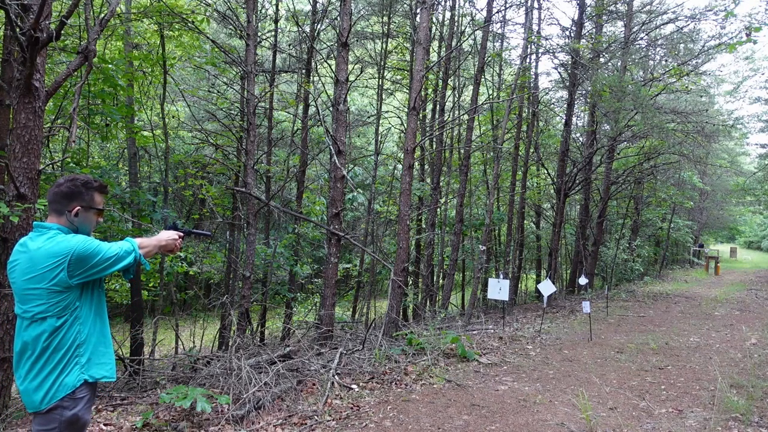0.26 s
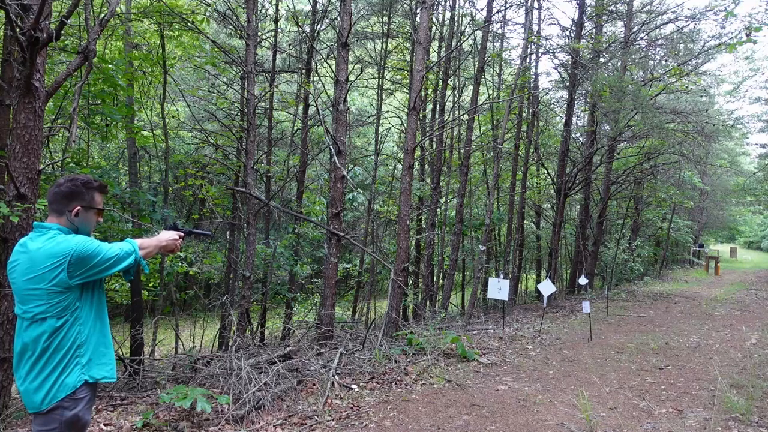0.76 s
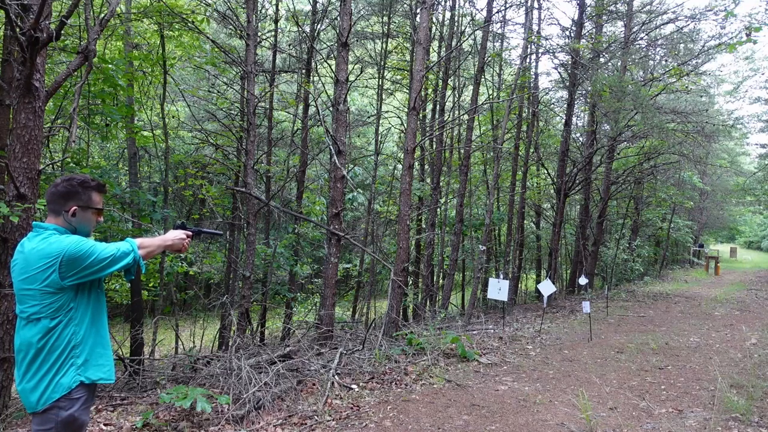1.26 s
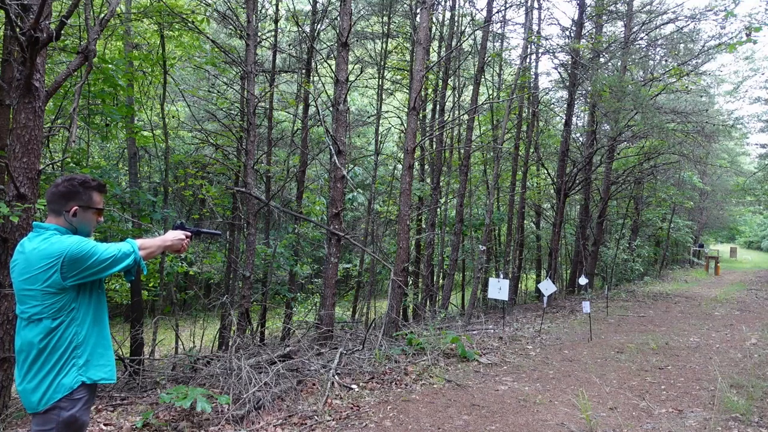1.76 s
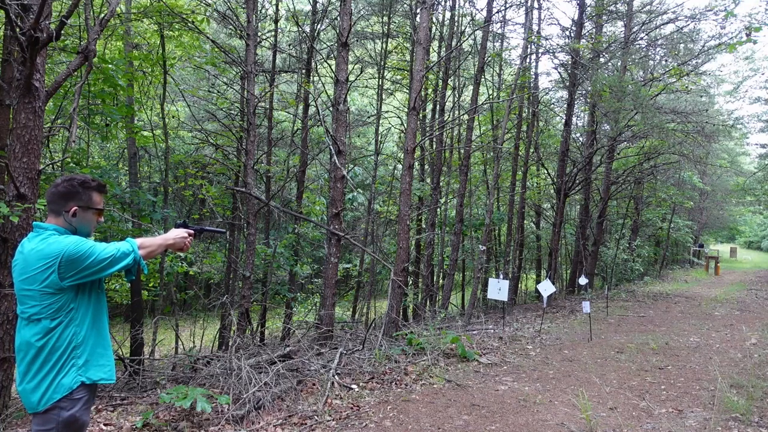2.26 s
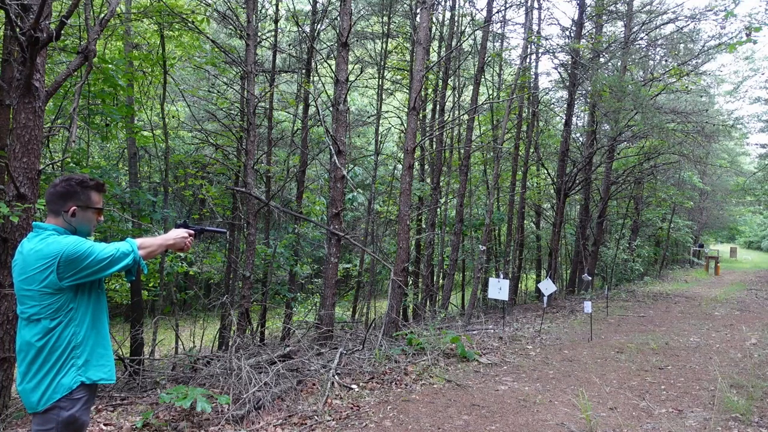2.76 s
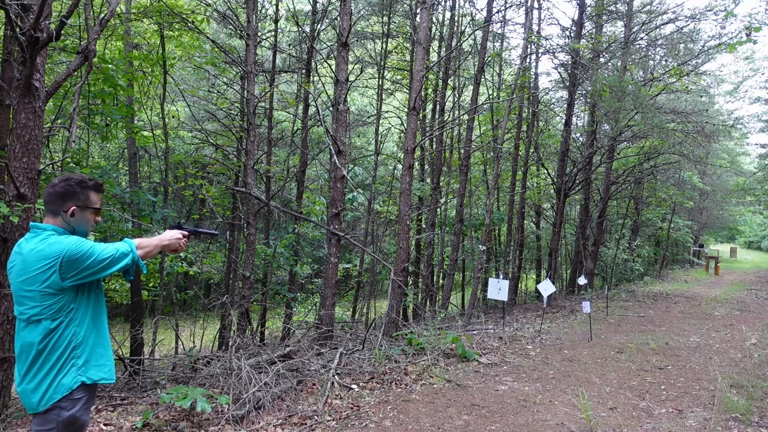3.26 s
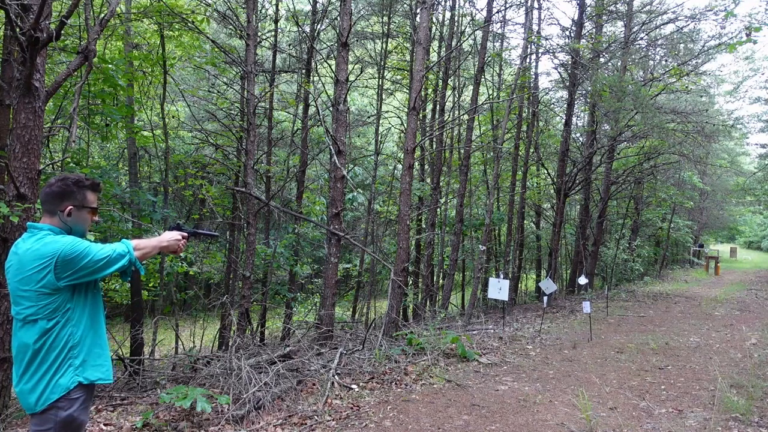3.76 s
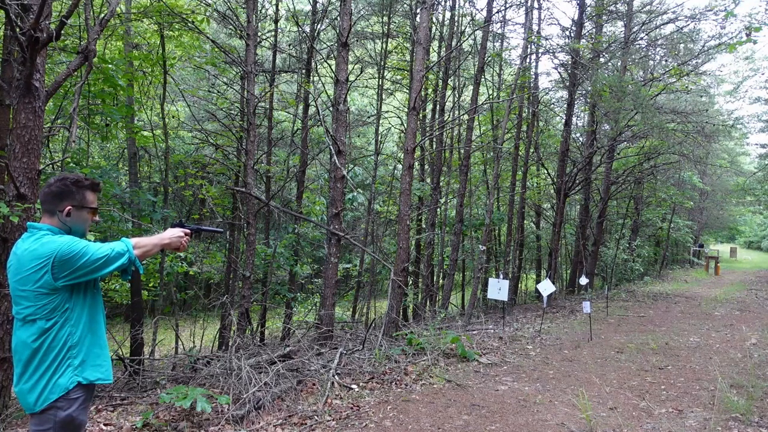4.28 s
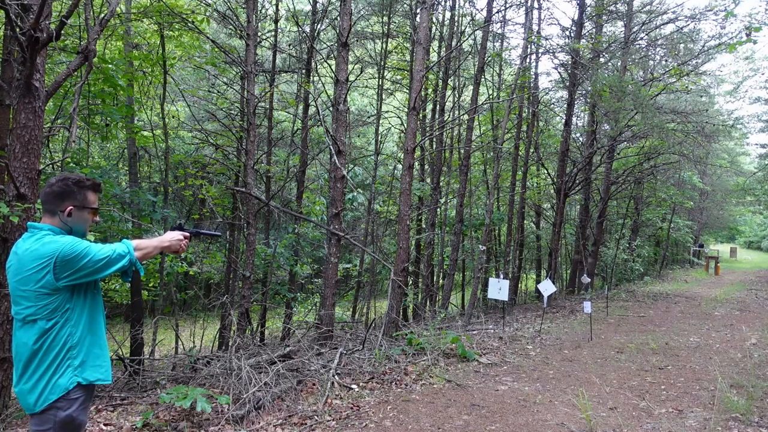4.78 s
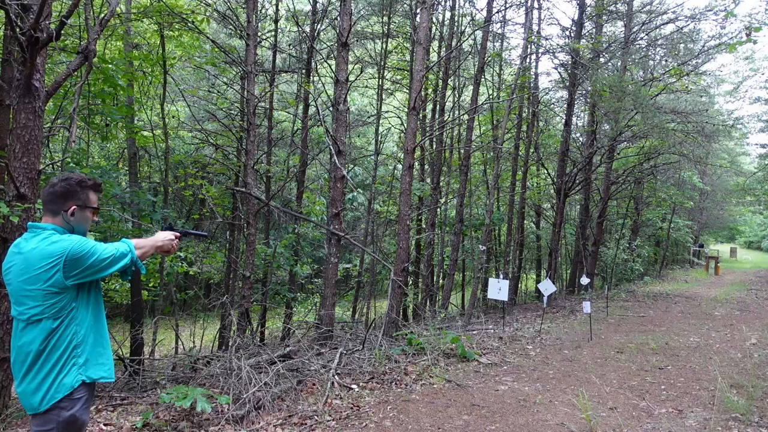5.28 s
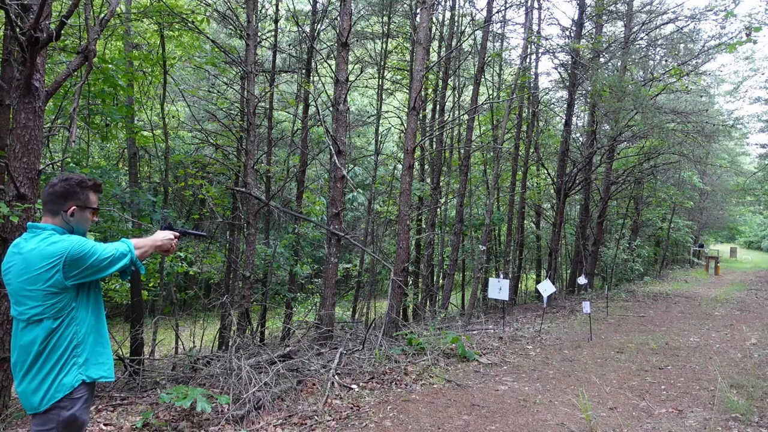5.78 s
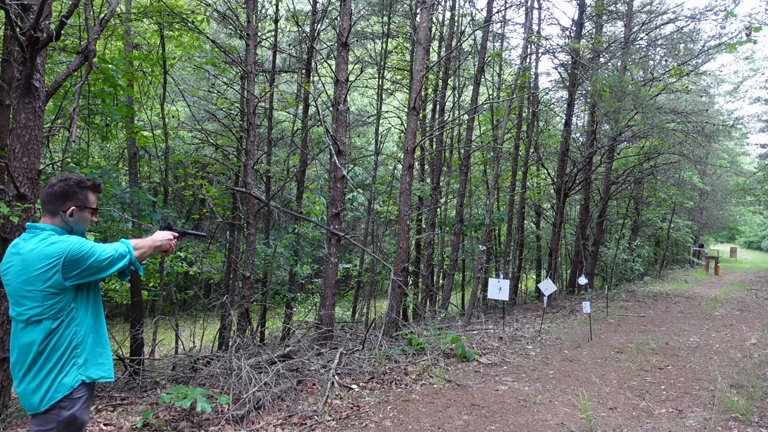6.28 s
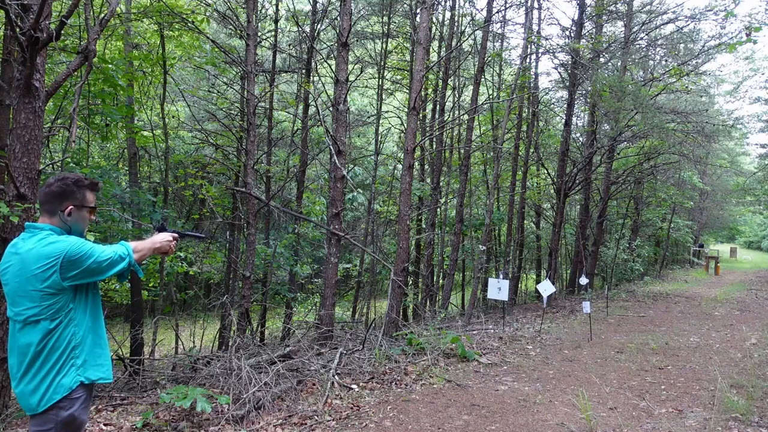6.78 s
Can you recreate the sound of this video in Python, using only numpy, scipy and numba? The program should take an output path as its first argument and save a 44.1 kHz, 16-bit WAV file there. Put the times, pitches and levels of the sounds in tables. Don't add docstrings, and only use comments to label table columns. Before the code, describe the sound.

Nine overloaded handgun bangs at uneven spacing, bullets clanging hanging steel almost instantly, forest reverberation fading, spent cases ticking in dry leaves between.

```python
import sys
import numpy as np
from scipy import signal
from scipy.fft import rfft, irfft, next_fast_len
from scipy.io import wavfile
from scipy.ndimage import uniform_filter1d
from numba import njit

SR = 44100
rng = np.random.default_rng(int(sys.argv[2]) if len(sys.argv) > 2 else 0)


def output_pcm(signal):
    pcm = np.clip(np.atleast_2d(signal).T, -1, 1) * 32767
    wavfile.write(sys.argv[1], SR, np.round(pcm).astype(np.int16))


def field_ratio(decibels):
    return 10 ** (np.asarray(decibels, dtype=float) / 20)


N = 310023


def along(points, hz):
    f, *columns = np.transpose(points)
    return [np.interp(np.log(hz + 1), np.log(f), column) for column in columns]


def noise(spectrum, size):
    gain = field_ratio(along(spectrum, np.fft.rfftfreq(size, 1 / SR))[0])
    x = irfft(rfft(rng.standard_normal(size)) * gain, size)
    return x / x.std()


def add(out, x, s):
    i = round(s * SR)
    x = x[max(-i, 0):][:N - max(i, 0)]
    out[max(i, 0):][:len(x)] += x


def burst(spectrum, t60, hold):
    t = np.arange(8192) / SR
    return noise(spectrum, size=8192) * field_ratio(-60 * np.maximum(t - hold, 0) / t60)


STEP = 16


def ring(hz, db, t60, t, linger_db=-18, beam=1):
    slow = field_ratio(-30 * t[::STEP] / t60)
    shape = field_ratio(db) * beam * slow * (slow + field_ratio(linger_db - hz / 600))
    shape = np.repeat(shape.astype(np.float32), STEP, axis=-1)[..., :len(t)]
    turns = (hz * t % 1).astype(np.float32)
    return shape * np.sin(np.float32(2 * np.pi) * turns)


# f/Hz, near trees level/dB, near t60/s, far trees level/dB, far t60/s
TREES = [(150, -44.5, 0.17, -72, 2.3), (377, -5.5, 0.48, -28.5, 3.12), (900, -2, 0.59, -28, 3.38),
         (2100, -1, 0.61, -23.5, 1.895), (3780, -2, 0.53, -33.5, 1.835), (7000, 1, 0.46, -28, 1.09),
         (10000, -3.5, 0.39, -35, 1.15), (15100, -14.5, 0.36, -50, 0.6)]
# t/s after the shot, level/dB
SWELL = [(0, -4.5), (.03, -3), (.07, 4), (.11, -3), (.15, 2.5), (.2, 2.5), (.3, 5)]


def wood(length=2):
    hz, t, z = signal.stft(rng.standard_normal(length * SR), SR, nperseg=256)
    near_db, near_t60, far_db, far_t60 = (c[:, None] for c in along(TREES, hz))
    gain = np.hypot(field_ratio(near_db - 60 * t / near_t60), field_ratio(far_db - 60 * t / far_t60))
    swell = field_ratio(np.interp(t, *np.transpose(SWELL)))
    roar = signal.istft(z * gain * swell, SR, nperseg=256)[1][:length * SR]
    trunks = np.repeat(rng.exponential(size=length * SR // 30), 30)
    fade = np.exp(-np.arange(length * SR) / SR / 0.31)
    return roar * field_ratio(1.55 * fade * (uniform_filter1d(trunks, size=20) - 4))


# t/s, charge level/dB, low push level/dB
SHOTS = [
    (-.2, 8, -20),
    (.2289, 0, -6),
    (0.6596, 2, -18),
    (1.6838, 0, -16),
    (2.66, -1, -6),
    (3.5408, -1, -5),
    (4.5178, -1, -3),
    (5.6642, 1.5, -1.5),
    (6.0412, -3, -7),
    (6.3554, -4.5, -7),
]


def wood_roar():
    out = np.zeros(N)
    for s, db, _ in SHOTS:
        add(out, field_ratio(db + 11.5) * wood(), s + .002)
    return out


def plate(shapes, modes, hits, sway_db, late, flash_db=0, gains_db=None):
    out = np.zeros(N)
    hz, across, down = np.transpose(shapes)[:, :, None]
    belly_db, t60 = np.transpose(modes)[:, :, None]
    ends = [row[0] for row in hits[1:]] + [N / SR]
    for k, ((s, x, y, ring_db, _), end) in enumerate(zip(hits, ends)):
        t = np.arange(round(min(end - s, 3, t60.max()) * SR)) / SR
        u = t[::STEP]
        age = late * (.1 - min(s, 0))
        struck = np.abs(np.cos(np.pi * across * x) * np.cos(np.pi * down * y)) + .03
        knots = rng.standard_normal((len(hz), 64))
        sway = np.array([np.interp(u * 17, np.arange(64), row) for row in knots])
        swing = (1 - 1.3 * np.abs(sway)) * np.minimum(u / .14, 1)
        beam = field_ratio(sway_db * np.minimum(hz / 3000, 1) * swing)
        beam *= field_ratio(flash_db * np.exp(-u / 0.055))
        level_db = belly_db + (gains_db[k] if gains_db else ring_db) + 60 * age / t60
        add(out, ring(hz, level_db, t60, t, beam=struck * beam).sum(0), s)
    return out


# f/Hz, level/dB
SPLAT = [(100, -38.5), (500, -13), (1300, 6.5), (3000, -2.5), (8000, -6), (16000, -16.5), (22000, -20)]


def splats(hits):
    out = np.zeros(N)
    for s, *_, db in hits:
        add(out, field_ratio(db) * burst(SPLAT, 0.025, hold=0.00084), s)
    return out


# t/s, spot across/0-1, spot down/0-1, ring level/dB, splat level/dB
SQUARE_HITS = [
    (-.166, .088, .234, -1.6, 8),
    (.2632, .377, .373, 12.5, 18),
    (.6938, .154, .219, 13.5, 15),
    (5.6977, .208, .14, 12.7, 16),
    (6.0752, .363, .385, 8.5, 11),
    (6.389, .159, .071, 5.3, 12),
]
# f/Hz, still lines across, still lines down
BODY_MODES = [(614.4, 0, 0), (889.5, 0, 0), (1545.2, 3, 1), (1571.7, 0, 2), (1954.4, 3, 2)]
# level/dB, t60/s
BODY = [(-14.5, 4.47), (-28, 5.9), (3.7, 1.34), (-9.8, 1.19), (-1.2, .89)]
HUM_DB = [9.5, 5.1, 3.4, 3.4, -.6, -1.7]
# f/Hz, still lines across, still lines down
SQUARE_MODES = [(2632, 3, 1), (3093, 2, 1), (3779, 3, 3), (4174, 4, 3), (4892, 3, 1), (4974, 5, 2),
                (5319, 3, 2), (5926, 3, 0), (6816, 4, 4), (7260, 3, 6), (7370, 5, 4), (8349, 5, 4),
                (8688, 1, 7), (13559, 4, 7)]
# level/dB, t60/s
SQUARE = [(-22.5, 1.08), (-18.4, 0.67), (-31.8, 1.1), (-17.0, 0.76), (-17.8, 0.45), (-28.4, 0.75),
          (-27.3, 0.83), (-21.7, 0.41), (-19.6, 0.71), (-21.1, 0.57), (-25.4, 0.55), (-16.6, 0.5),
          (-15.0, 0.46), (-17.6, 0.51)]
# f/Hz, still lines across, still lines down
SQUARE_MORE_MODES = [(3332, 3, 1), (9378, 4, 2), (9916, 2, 7), (10817, 1, 7), (11066, 4, 6), (12182, 3, 6),
                     (13334, 4, 7), (15518, 5, 7), (5977, 5, 2), (7176, 5, 4), (8724, 6, 2), (13639, 6, 1),
                     (13765, 7, 2), (14904, 7, 2)]
# level/dB, t60/s
SQUARE_MORE = [(-28.1, 0.82), (-26.9, 0.72), (-25.4, 0.49), (-27.2, 0.51), (-30.8, 0.33), (-29.0, 0.53),
               (-23.9, 0.53), (-36.3, 0.28), (-29.7, 0.62), (-32.2, 0.23), (-28.0, 0.36), (-39.1, 0.67),
               (-41.6, 0.17), (-37.4, 0.4)]
# f/Hz, still lines across, still lines down
SQUARE_HIGH_MODES = [(10336, 3, 3), (10643, 3, 3), (13190, 5, 4), (13993, 5, 4), (14045, 5, 4), (14591, 5, 4)]
# level/dB, t60/s
SQUARE_HIGH = [(-34, .61), (-33, .32), (-42, .8), (-39, .47), (-42, .64), (-44, .4)]


def square_plate():
    flash_db = 3
    out = plate(BODY_MODES, BODY, SQUARE_HITS, sway_db=3, late=0, gains_db=HUM_DB)
    out += plate(SQUARE_MODES, SQUARE, SQUARE_HITS, sway_db=6, late=1, flash_db=flash_db)
    out += plate(SQUARE_MORE_MODES, SQUARE_MORE, SQUARE_HITS, sway_db=5, late=1, flash_db=flash_db)
    out += plate(SQUARE_HIGH_MODES, SQUARE_HIGH, SQUARE_HITS, sway_db=4, late=1)
    return out + splats(SQUARE_HITS)


# f/Hz, level/dB
AIR = [(15, -24), (30, 0), (100, 3.5), (200, -5.5), (500, -4), (1500, -15.5), (4000, -33), (16000, -42)]
# t/s, level/dB
BREEZE = [
    (0, -36.5),
    (1.002, -46),
    (1.601, -42),
    (2.5, -43.5),
    (3.5, -47),
    (4.5, -44.5),
    (5.5, -49),
    (6.2, -51),
    (7.03, -54),
]


def quiet_air():
    level = field_ratio(np.interp(np.arange(N) / SR, *np.transpose(BREEZE)))
    return level * noise(AIR, size=next_fast_len(N, True))[:N]


BANK_S = [
    -.0028,
    .0225,
    .0252,
    .127,
    .158,
    .185,
]
# level/dB, t60/s
BANKS = [
    (-30, 0.016),
    (-5, .014),
    (-3.5, 0.0053),
    (-16.5, 0.021),
    (-13.5, .006),
    (-20, 0.013),
]
# f/Hz, level/dB
ECHO = [(100, -37), (400, -10), (1200, 4), (3000, -6.5), (5500, -1.5), (10000, -11), (16000, -11),
        (22000, -19.5)]
# f/Hz, level/dB
FAR = [(300, -30), (1000, -1.5), (3000, 2), (6000, -2), (10000, -5), (16000, -51)]


def hammer_and_bank():
    out = np.zeros(N)
    for s, db, _ in SHOTS:
        for delay, (echo_db, t60) in zip(BANK_S, BANKS):
            colour = ECHO if delay < .1 else FAR
            add(out, field_ratio(db + 8.5 + echo_db) * burst(colour, t60, hold=0.00096), s + delay)
    return out


# f/Hz, level/dB
BLAST = [(25, -21), (100, -17.5), (300, -2), (1000, 0), (3000, -7), (6300, 0), (10000, -5.5),
         (16000, -22.5)]


def muzzle_blast():
    out = np.zeros(N)
    u = np.arange(2048) / SR / 0.00085
    push = u * (2 - u) * np.exp(-u)
    for s, db, push_db in SHOTS:
        add(out, field_ratio(db + 9) * burst(BLAST, .016, hold=.0032), s)
        add(out, field_ratio(push_db + 9.5) * push, s)
    return out


# t/s, step level/dB
JOLTS = [
    (0.6933, -4.5),
    (1.7175, -33.5),
    (4.5521, -22),
]


def jolts():
    steps = np.zeros(N)
    for s, db in JOLTS:
        steps[round(s * SR):] += field_ratio(db)
    cut_hz = 11
    return signal.sosfilt(signal.butter(3, cut_hz, "high", fs=SR, output="sos"), steps)


def tick(out, s, db, hz, t60):
    colour = [(500, -40), (2500, -14), (hz, 0), (hz + 4000, -8), (hz + 11000, -14)]
    click = burst(colour, t60, hold=.0005)
    rustle = field_ratio(-21) * burst(colour, .14, hold=0)
    add(out, field_ratio(db - 6) * (click + rustle), s)


# t/s, peak level/dB
TWIGS = [
    (.997, -27),
    (2.157, -45),
    (2.278, -45),
    (2.448, -38),
    (5.087, -46),
    (5.62, -41),
    (5.632, -42),
    (6.687, -30),
    (6.995, -45),
]


def twigs():
    out = np.zeros(N)
    for s, db in TWIGS:
        tick(out, s, db, hz=10500, t60=.01)
    return out


# t/s,
# peak level/dB
TICKS = [(1.2534, -42.5), (1.287, -20.5), (1.3114, -39), (1.5084, -38), (1.5477, -39), (1.648, -35.5),
         (2.381, -18), (2.4344, -27.5), (2.501, -44.5), (2.5285, -32), (2.6283, -35), (3.471, -40),
         (3.5123, -35), (4.1165, -24), (4.2845, -43), (4.334, -39), (4.362, -41), (4.4322, -45),
         (4.4806, -36), (5.108, -36), (5.161, -19.5), (5.41, -36), (5.4584, -44), (5.468, -35),
         (5.5512, -39), (5.5664, -46), (5.2609, -50), (5.5754, -51), (5.6047, -22)]


def cases_in_leaves():
    out = np.zeros(N)
    for s, db in TICKS:
        above_db = db + 20
        tick(out, s, db, hz=5700 - 45 * above_db, t60=.009 - .00015 * above_db)
    return out


# t/s, peak level/dB, colour f/Hz
TRIGGER = [
    (1.667, -30, 3000),
    (1.675, -28, 6000),
    (2.6439, -29, 3000),
    (3.527, -34, 3000),
    (4.489, -37, 7000),
    (4.499, -33, 4000),
    (5.6475, -34, 2950),
]


def trigger():
    out = np.zeros(N)
    for s, db, hz in TRIGGER:
        tick(out, s, db, hz, t60=.011)
    return out


POST_S = [
    1.7183,
    1.895,
    2.09,
    3.5758,
    4.07,
]
# level/dB, t60/s
POST = [
    (12, 0.21),
    (-13, 0.16),
    (-27.5, 0.7),
    (2.5, 0.12),
    (-27, 0.115),
]


def stands():
    out, t = np.zeros(N), np.arange(SR // 2) / SR
    for s, (db, t60) in zip(POST_S, POST):
        add(out, ring(1362, db, t60, t), s)
    return out


# t/s, spot across/0-1, spot down/0-1, ring level/dB, splat level/dB
DIAMOND_HITS = [
    (1.7184, .468, .072, 6.5, 10.5),
    (3.5755, .242, .375, 9.5, 11),
]
# f/Hz, still lines across, still lines down
DIAMOND_MODES = [(1954, 0, 2), (3345, 1, 4), (3386, 0, 3), (3461, 2, 3), (4237, 0, 3), (5585, 3, 4),
                 (6228, 1, 6), (6508, 2, 3), (6928, 5, 3), (7920, 2, 6), (8428, 3, 3), (8724, 7, 3),
                 (11077, 6, 1), (12350, 6, 5)]
# level/dB, t60/s
DIAMOND = [(-34.9, 1.4), (0.0, 0.58), (-29.0, 0.88), (-24.1, 0.73), (-28.6, 0.65), (-7.5, 0.74),
           (-18.6, 0.47), (-25.7, 0.58), (-17.5, 0.47), (-11.4, 0.61), (-20.1, 0.49), (-22.6, 0.43),
           (-22.7, 0.35), (-17.7, 0.43)]
# f/Hz, still lines across, still lines down
DIAMOND_MORE_MODES = [(3774, 0, 5), (7004, 3, 4), (10026, 7, 3), (10277, 2, 5), (10562, 5, 3), (10804, 6, 1),
                      (11000, 3, 6), (12321, 5, 3), (14608, 7, 0), (14797, 6, 0), (14917, 3, 4), (15490, 6, 1)]
# level/dB, t60/s
DIAMOND_MORE = [(-36.6, 0.79), (-20.1, 0.71), (-35.7, 0.8), (-26.2, 0.43), (-39.0, 0.54), (-35.6, 0.75),
                (-24.2, 0.43), (-37.7, 0.5), (-42.2, 0.34), (-28.9, 0.45), (-25.9, 0.44), (-26.6, 0.43)]


def diamond_plate():
    flash_db = 9
    out = plate(DIAMOND_MODES, DIAMOND, DIAMOND_HITS, sway_db=6, late=1, flash_db=flash_db)
    out += plate(DIAMOND_MORE_MODES, DIAMOND_MORE, DIAMOND_HITS, sway_db=7, late=1, flash_db=flash_db)
    return out + splats(DIAMOND_HITS)


# t/s, spot across/0-1, spot down/0-1, ring level/dB, splat level/dB
SMALL_HITS = [
    (2.694, .35, .03, .1, 13),
    (4.553, .1, .01, .1, 4.4),
]
# f/Hz, still lines across, still lines down
SMALL_MODES = [(4140, 1, 0), (6928, 0, 1), (9480, 0, 2), (9500, 2, 0)]
# level/dB, t60/s
SMALL = [(-5, .26), (-19, .2), (7.5, .11), (-19, .6)]


def small_plate():
    return plate(SMALL_MODES, SMALL, SMALL_HITS, sway_db=5, late=0) + splats(SMALL_HITS)


# t/s, ring level/dB, crack level/dB
CASES = [
    (3.2466, -3.5, -3.5),
    (5.2844, -35.5, -42),
    (5.329, -44.5, -56),
]
# f/Hz, level/dB, t60/s
NEAR_CASE = [(1330, -8, .025), (5570, -1.5, 0.0088), (11000, -1, 0.0085), (12200, -40, 0.0827)]
# f/Hz, level/dB, t60/s
CLINK = [(2410, 12, 0.034), (2750, 4, 0.087), (4130, -0.5, 0.083), (4600, -6, .12), (5100, -1.5, 0.068),
         (6900, -12, .3), (8376, -23.5, .4)]
# f/Hz, level/dB
RAP = [(400, -50), (900, -18), (1300, -1), (6000, -2), (11000, -13), (16000, -14.5)]


def case_raps():
    out, t = np.zeros(N), np.arange(SR // 3) / SR
    for (s, db, crack_db), modes in zip(CASES, (NEAR_CASE, CLINK, CLINK)):
        hz, level, t60 = np.transpose(modes)[:, :, None]
        add(out, ring(hz, level + db, t60, t).sum(0), s)
        crack = burst(RAP, 0.011, hold=0.00065) + field_ratio(-26) * burst(RAP, 0.26, hold=0)
        add(out, field_ratio(crack_db) * crack, s)
    return out


def scene():
    shots = wood_roar() + hammer_and_bank() + muzzle_blast()
    steel = square_plate() + stands() + diamond_plate() + small_plate()
    ground = twigs() + cases_in_leaves() + case_raps()
    return (shots + steel + ground + trigger() + quiet_air())[None]


@njit
def follow(power, attack, release):
    out, level = np.empty_like(power), power[:400].mean()
    for i in range(len(power)):
        level += (attack if power[i] > level else release) * (power[i] - level)
        out[i] = level
    return out


def band_limit(x):
    return signal.sosfilt(signal.butter(12, 16370, fs=SR, output="sos"), x)


def record(dry):
    power = uniform_filter1d(dry[0] ** 2, size=64, origin=31)
    level = follow(np.abs(power), 1 / (0.011 * SR), 1 / (0.017 * SR))
    gain = (1 + (level / field_ratio(-11.5) ** 2) ** 2.64) ** (-.42 / 2.292)
    clipped = np.clip(dry * gain + jolts(), -.98, .98)
    edge = signal.ellip(8, .3, 60, 16100, fs=SR, output="sos")
    return band_limit(signal.sosfilt(edge, clipped))


dry = scene()
out = record(dry)
output_pcm(out)
```